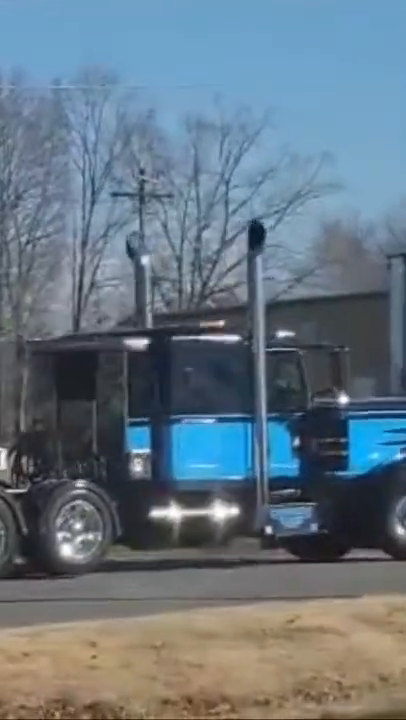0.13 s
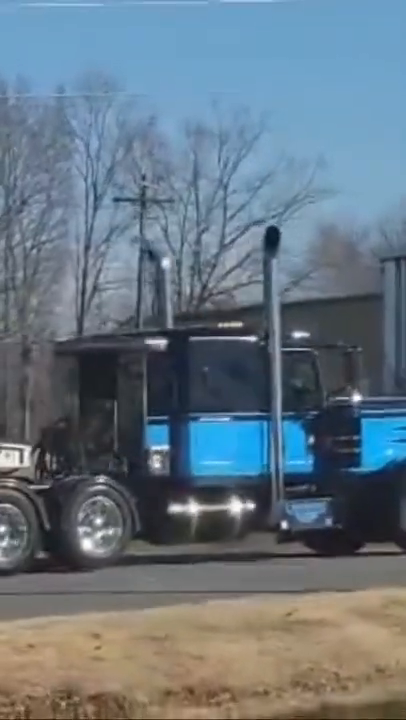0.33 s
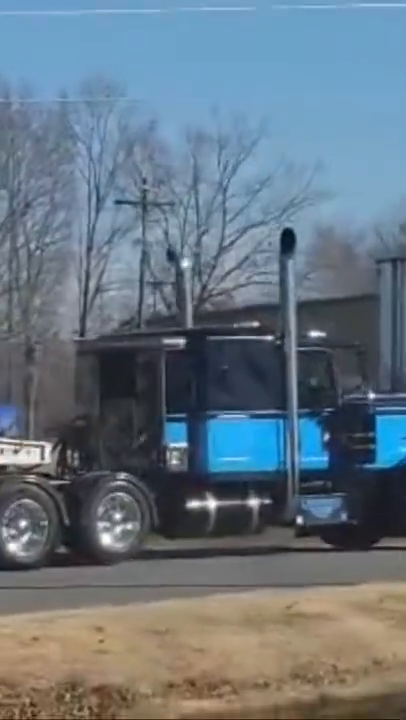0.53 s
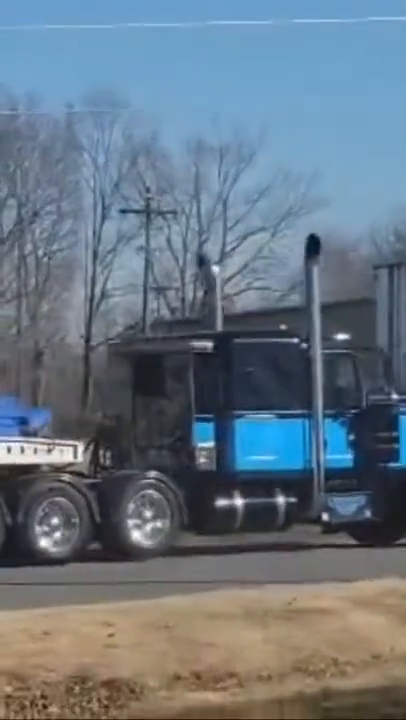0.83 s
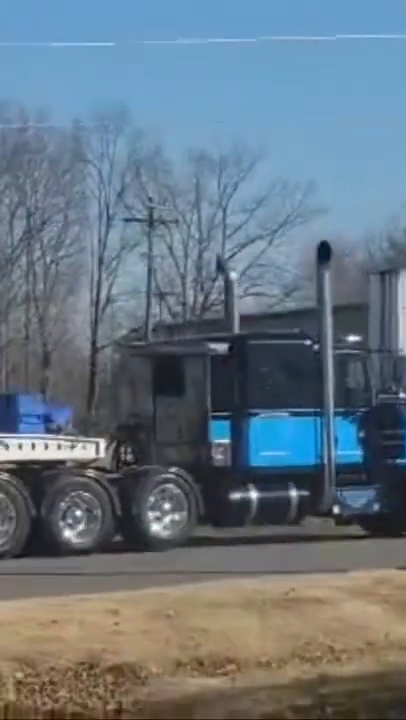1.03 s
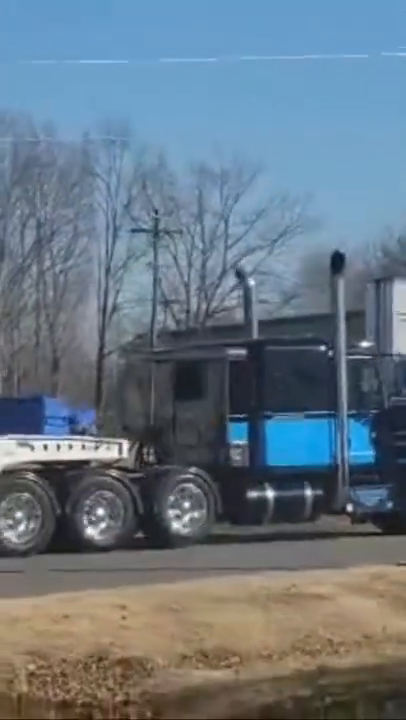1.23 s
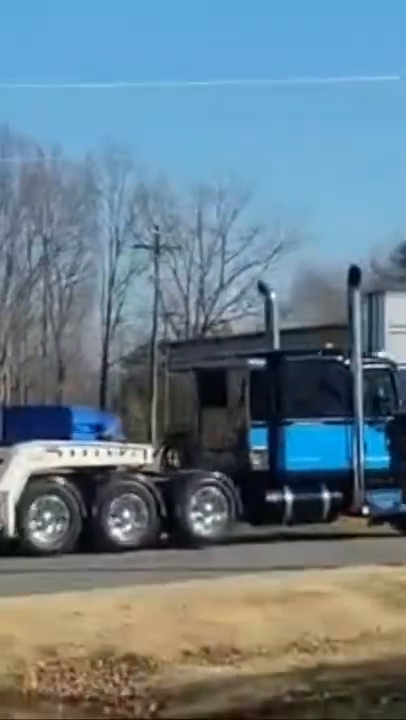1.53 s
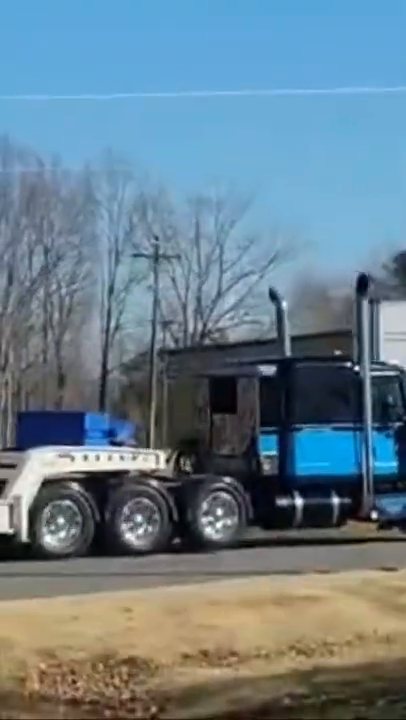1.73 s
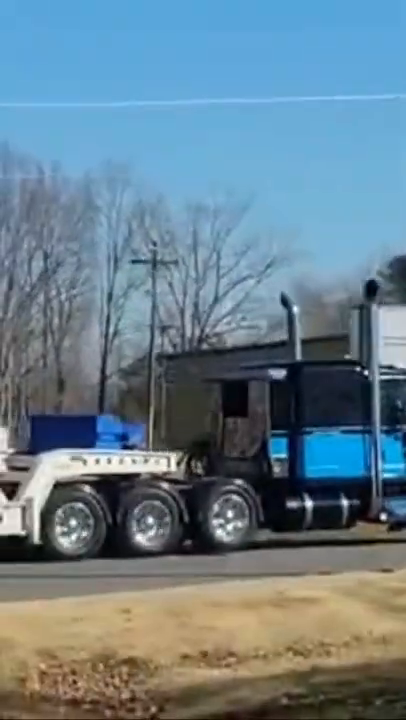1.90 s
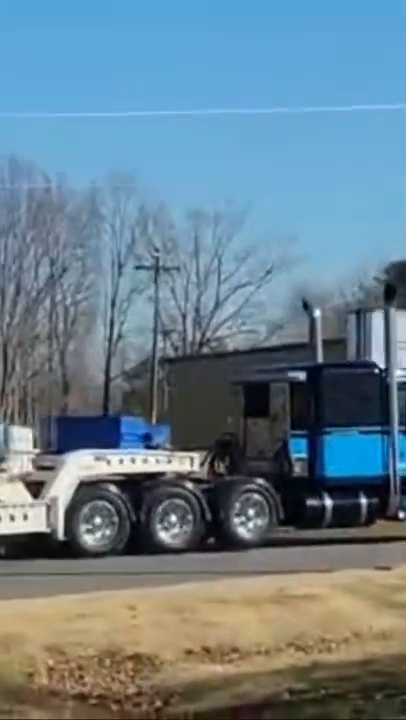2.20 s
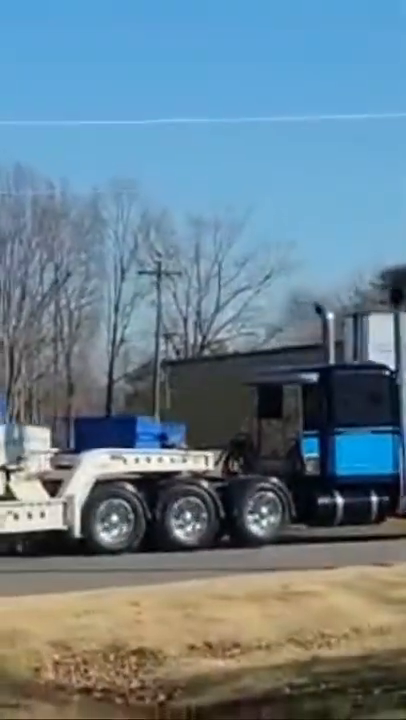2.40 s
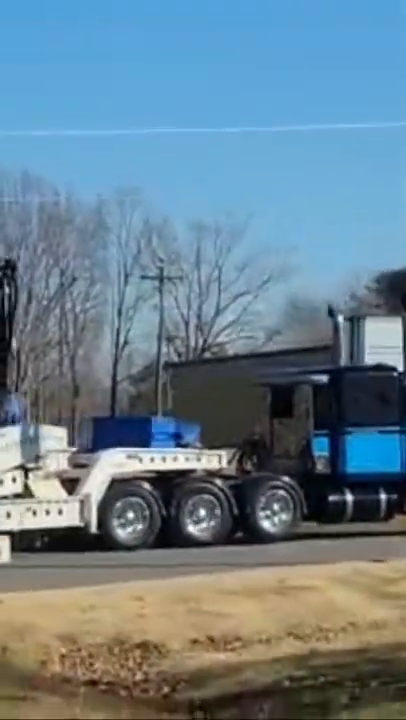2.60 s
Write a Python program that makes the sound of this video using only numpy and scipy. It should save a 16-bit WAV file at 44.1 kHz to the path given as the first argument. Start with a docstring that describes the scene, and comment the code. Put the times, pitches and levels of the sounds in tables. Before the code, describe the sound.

Heavy diesel engine idling close by, lumpy deep exhaust throb, metallic knocking and a quick repeating chirp

```python
"""A big eight-cylinder engine throbs at idle close by, while a heavy truck hauls a trailer on a road.
Uneven firings thump and puff in the exhaust and knock in the block; low cycle orders make the boom.
A second drone, probably the truck's, beats against it. Driven parts hum, and road noise lies underneath.
Fittings rattle, valves tap, loose metal clinks; something, probably a belt, chirps once a cycle."""
import sys
import numpy as np
from scipy import signal
from scipy.fft import rfft, irfft, next_fast_len
from scipy.io import wavfile
from scipy.ndimage import map_coordinates

SR = 44100
rng = np.random.default_rng(int(sys.argv[2]) if len(sys.argv) > 2 else 0)


def file_out(sig):
    """Save sig as 16-bit WAV at sys.argv[1]."""
    # one column per channel
    cols = np.atleast_2d(sig).T
    # limit, then scale
    lim = np.clip(cols, -1, 1)
    pcm = np.round(lim * 32767).astype(np.int16)
    wavfile.write(sys.argv[1], SR, pcm)


N = 121275

# crank speed (time [s], speed [rpm])
CRANK_SPEED = [(0, 604), (.7, 597.2), (1.6, 595.8), (2.75, 596.8)]
# cylinders in firing order, relative (pulse, sets boom phases [dB], bark [dB], knock [dB])
CYLINDERS = [(-2, -4, -1), (-10, 0.5, -2), (1, -5.5, 4.5), (-1, 2, -5), (-16, -6, 4), (0.5, -3, -0.5),
             (-9.5, -1, 2.5), (-1.5, -1.5, 2)]
FIRST_FIRING_S, KNOCK_LEAD_S, JITTER_S, ATTACK_S = 0.0245, 0.02, 0.001, 0.0014

# exhaust boom (multiple of cycle rate, level [dB])
BOOM_ORDERS = [(8, -25), (11, -27.5), (12, -36), (13, -22), (15, -37), (16, -33.5), (17, -37), (18, -43),
               (19, -38), (20, -38.5), (22, -42.5), (24, -40), (25, -43.5), (27, -37), (29, -42), (31, -46),
               (32, -37.5), (34, -48), (35, -38), (36, -47.5), (38, -45.5), (40, -45), (45, -47.5),
               (46, -47), (48, -47)]
SMEAR_ABOVE_ORDER, SMEAR_RAD_PER_ORDER = 15, 0.25

# exhaust thump spectrum (frequency [Hz], relative level [dB])
PIPE_SPECTRUM = [(90, -34), (140, -6.5), (200, -8), (250, -10.5), (285, 7.5), (335, -3.5), (400, -5.5),
                 (540, -12.5), (640, -17), (1200, -31), (3000, -69)]
# gas puff spectrum (frequency [Hz], relative level [dB])
PUFF_SPECTRUM = [(20, -38), (36, -2), (62, -2.5), (100, -1.5), (135, 2), (250, -5), (300, -10.5),
                 (530, -17), (650, -36), (1100, -40.5), (1500, -40.5), (5000, -70)]
PIPE_DB, PUFF_DB, PUFF_DECAY_S = -41.5, -31.5, 0.0064
WALL_DB, WALL_T60_S = 1.5, 0.37

# truck drone (multiple of its firing rate, level [dB])
TRUCK_ORDERS = [(1, -34.5), (2, -35.5)]
TRUCK_HZ, TRUCK_FIRING_S = 67.8, 0.009

# hum of belt-driven parts (frequency [Hz], level [dB])
HUMS = [(96.3, -43), (123.7, -38), (228.7, -47), (278.3, -48), (333.5, -55), (515, -57.5), (557, -53.5),
        (597, -63)]

# tyre and road spectrum (frequency [Hz], relative level [dB])
ROAD_SPECTRUM = [(180, -23), (300, -5), (554, -14.5), (649, -22), (1200, -21.5), (1470, -32.5),
                 (1990, -29.5), (2400, -33.5), (2560, -45), (2940, -40), (3970, -39.5), (5530, -45),
                 (6100, -44), (7820, -47), (11100, -58), (13000, -64.5)]
ROAD_DB = -44

RATTLE_PER_S, RATTLE_DB, RATTLE_DECAY_S = 240, -58, 0.006

# resonances of block and covers (frequency [Hz], width [Hz], relative level [dB])
BLOCK_MODES = [(794, 26, 9), (1120, 32, 4), (1724, 29, 3), (1883, 310, -6.5), (2007, 43, 5), (2359, 36, -3),
               (2826, 72, -7), (2950, 25, -0.5), (3137, 48, -7.5), (3344, 31, -2), (3570, 110, -14.5),
               (3863, 82, -7.5), (4110, 190, -14.5), (4536, 38, -10), (4830, 64, -15), (5110, 44, -13.5)]
KNOCK_DB, KNOCK_DECAY_S = -53.5, 0.021

# valve taps, once a cycle (time of one tap [s], pitch [Hz], relative level [dB])
VALVE_TAPS = [(.028, 5190, 6), (.048, 4040, 5.5), (0.049, 3356, 12.5), (0.106, 3640, 5.5),
              (.154, 4870, 3.5), (.203, 2972, 11), (0.202, 6420, -1.5)]
VALVE_DB, VALVE_DECAY_S, VALVE_WOBBLE_PER_S = -80, 0.014, 160

# clinks of loose metal (time [s], relative level [dB])
CLINKS = [(0.06, 0), (.598, 4), (0.658, 3.5), (.855, 1), (1.005, -0.5), (1.054, 0.5), (1.255, 2),
          (2.412, 3)]
# clink spectrum (frequency [Hz], relative level [dB])
CLINK_SPECTRUM = [(1500, -28.5), (3000, 1), (4000, -3), (5200, -4), (5700, -3.5), (7500, -6.5),
                  (10000, -16.5), (13000, -54)]
CLINK_DB, CLINK_DECAY_S = -74.5, 0.014

# chirp spectrum (frequency [Hz], relative level [dB])
CHIRP_SPECTRUM = [(600, -66.5), (1080, -27), (1200, 1.5), (1270, 4), (1350, -3.5), (1470, -32), (2500, -57)]
CHIRP_DB, CHIRP_START_S = -46.5, 0.1486
CHIRP_RISE_S, CHIRP_HOLD_S, CHIRP_DECAY_S = 0.01, 0.013, 0.017

# left-right correlation of noise, clipped to -1..1 (frequency [Hz], correlation)
CORRELATION = [(60, -0.7), (170, 1.07), (350, 0.66), (700, 0.48), (1300, -0.1), (2200, 0.57), (5000, -0.02),
               (10000, 0.1)]
# channel balance (frequency [Hz], left over right [dB])
BALANCE = [(40, -8), (65, 1.7), (170, -0.4), (350, 3), (550, -0.5), (800, 3.5), (1400, 3), (2000, 0.4),
           (3100, 2), (4200, -0.5), (10000, 1)]
CLATTER_FADE_DB_PER_S, TOP_HZ = -1, 13000


def amp(db):
    """Decibels to gain."""
    return 10 ** (np.asarray(db) / 20)


def unit(x):
    """Scale to rms 1."""
    return x / np.sqrt(np.mean(x ** 2) + 1e-20)


def along(points, hz):
    """Interpolate (Hz, value) points on a log frequency axis."""
    f, v = np.transpose(points)
    return np.interp(np.log(hz + 1), np.log(f + 1), v)


def wobble(knots_per_s):
    """Smooth random curve through normally distributed knots."""
    knots = rng.standard_normal(int(N * knots_per_s / SR) + 4)
    return map_coordinates(knots, [np.arange(N) * knots_per_s / SR])


def filtered(x, response):
    """Apply a response given as a function of frequency."""
    m = next_fast_len(N + SR // 2)
    return irfft(rfft(x, m) * response(np.fft.rfftfreq(m, 1 / SR)), m)[..., :N]


def coloured(x, spectrum):
    """Shape x by (Hz, dB) points, at rms 1."""
    return unit(filtered(x, lambda hz: amp(along(spectrum, hz))))


def noise():
    """White stereo noise; the mid-side split sets the left-right correlation at each frequency."""
    def mid_side_gains(hz):
        angle = np.arccos(np.clip(along(CORRELATION, hz), -1, 1)) / 2
        return np.array([np.cos(angle), np.sin(angle)])

    mid, side = filtered(rng.standard_normal((2, N)), mid_side_gains)
    return np.array([mid + side, mid - side])


def cycles(start_s):
    """Engine cycles (two crank turns each) counted from a moment."""
    t = np.arange(N) / SR
    turned = np.cumsum(np.interp(t, *np.transpose(CRANK_SPEED))) / SR / 120
    return turned - np.interp(start_s, t, turned)


def firings(start_s, levels_db, scatter_db):
    """One impulse per event, evenly spaced in the cycle, with random level and timing errors."""
    count = np.floor(cycles(start_s) * len(levels_db)).astype(int)
    at = np.flatnonzero(np.diff(count)) + 1
    level_error, late = rng.standard_normal((len(at), 2)).T
    sizes = amp(levels_db[count[at] % len(levels_db)] + scatter_db * level_error)
    jittered = at + (JITTER_S * SR * late).astype(int)
    return np.bincount(np.clip(jittered, 0, N - 1), sizes, N)


def bursts(pulses, decay_s):
    """A short rise-and-decay envelope after each impulse, at rms 1."""
    t = np.arange(SR // 8) / SR
    envelope = np.exp(-t / decay_s) * (1 - np.exp(-t / ATTACK_S))
    return unit(signal.fftconvolve(pulses, envelope)[:N])


def boom(pulse_db):
    """Unsteady cycle orders, phased by the uneven firing pattern; pipe and walls smear high ones."""
    turn, slots = cycles(FIRST_FIRING_S), np.arange(len(pulse_db)) / len(pulse_db)
    out = np.zeros(N)
    for order, db in BOOM_ORDERS:
        pattern = np.sum(amp(pulse_db) * np.exp(-2j * np.pi * order * slots))
        smear_rad = SMEAR_RAD_PER_ORDER * max(order - SMEAR_ABOVE_ORDER, 0) * rng.standard_normal()
        phase = 2 * np.pi * order * turn + np.angle(pattern) + smear_rad
        out += amp(db + 1.54 * wobble(13)) * np.cos(phase)
    return out


def exhaust(bark_db):
    """Each firing thumps through the pipe, scatters off nearby walls and drags a puff of gas."""
    pulses = firings(FIRST_FIRING_S, bark_db, scatter_db=2.3)
    t = np.arange(SR // 4) / SR
    tail = noise()[:, :len(t)] * np.exp(-np.log(1000) * t / WALL_T60_S)
    tail /= np.linalg.norm(tail[0])
    echo = signal.fftconvolve(pulses[None], tail, axes=1)[:, :N]
    thumps = coloured(pulses + amp(WALL_DB) * echo, PIPE_SPECTRUM)
    # 1.9: steady gas flow under the puffs
    puffs = coloured(noise() * (bursts(pulses, PUFF_DECAY_S) + 1.9), PUFF_SPECTRUM)
    return amp(PIPE_DB) * thumps + amp(PUFF_DB) * puffs


def truck():
    """Even drone of harmonics; beats with the engine's order 13 about three times a second."""
    turn = TRUCK_HZ * (np.arange(N) / SR - TRUCK_FIRING_S)
    return sum(amp(db + wobble(8.4)) * np.cos(2 * np.pi * k * turn) for k, db in TRUCK_ORDERS)


def driven_parts():
    """Belt-driven parts hum at fixed pitches, wavering in level and phase."""
    t = np.arange(N) / SR
    out = np.zeros(N)
    for hz, db in HUMS:
        level = amp(db + 1.5 * wobble(9.6))
        out += level * np.sin(2 * np.pi * hz * t + 0.61 * wobble(7.9))
    return out


def road():
    """Rush of tyres and road: coloured noise, slightly unsteady."""
    return amp(ROAD_DB + 1.2 * wobble(6.58)) * coloured(noise(), ROAD_SPECTRUM)


def rattle(low_hz=1700, high_hz=4600):
    """Fittings rattle in a random scatter of tiny decaying rings, the high ones weaker."""
    out, t = np.zeros((2, N + SR)), np.arange(SR // 20) / SR
    envelope = np.exp(-t / RATTLE_DECAY_S) * (1 - np.exp(-t / ATTACK_S))
    for when, place, angle in rng.random((int(RATTLE_PER_S * N / SR), 3)):
        hz = low_hz * (high_hz / low_hz) ** place
        # opposite phase shifts left and right
        ring = np.sin(2 * np.pi * hz * t + np.outer([1, -1], np.pi * (angle - 0.5)))
        out[:, int(when * N):][:, :len(t)] += ring * envelope / np.sqrt(hz)
    return amp(RATTLE_DB) * unit(out[:, :N])


def block_response(f):
    """Sum of block and cover resonances with alternating signs."""
    total = 0
    for k, (centre, width, db) in enumerate(BLOCK_MODES):
        mode = 1j * f * width / (centre * centre - f * f + 1j * f * width)
        total = total + amp(db) * mode * (-1) ** k
    return total


def knocks(knock_db):
    """Combustion knocks, as noise bursts over a steady floor, ring the block."""
    pulses = firings(FIRST_FIRING_S - KNOCK_LEAD_S, knock_db, scatter_db=2.5)
    drive = noise() * (bursts(pulses, KNOCK_DECAY_S) + 0.6)
    return amp(KNOCK_DB) * unit(filtered(drive, block_response))


def valves():
    """Each valve rings briefly near its own pitch once a cycle; random phase broadens the tone."""
    out, t = np.zeros((2, N)), np.arange(N) / SR
    for tap_s, hz, db in VALVE_TAPS:
        phase = np.array([wobble(VALVE_WOBBLE_PER_S), wobble(VALVE_WOBBLE_PER_S)])
        ring = np.sin(2 * np.pi * hz * t + phase)
        taps = bursts(firings(tap_s, np.zeros(1), scatter_db=3.5), VALVE_DECAY_S)
        out += amp(VALVE_DB + db) * taps * ring
    return out


def clinks():
    """Loose metal clinks now and then: short bursts of bright noise."""
    times_s, levels_db = np.transpose(CLINKS)
    pulses = np.bincount((times_s * SR).astype(int), amp(levels_db), N)
    return amp(CLINK_DB) * coloured(noise(), CLINK_SPECTRUM) * bursts(pulses, CLINK_DECAY_S)


def chirp():
    """Rough chirp of even strength once a cycle: narrow noise with its own envelope flattened."""
    turn = cycles(CHIRP_START_S)
    age_s = turn % 1 / (np.gradient(turn) * SR)
    decay_age_s = np.maximum(age_s - CHIRP_RISE_S - CHIRP_HOLD_S, 0)
    swell = np.minimum(age_s / CHIRP_RISE_S, 1) * np.exp(-decay_age_s / CHIRP_DECAY_S)
    phase = np.angle(signal.hilbert(coloured(noise(), CHIRP_SPECTRUM)))
    return amp(CHIRP_DB) * swell * unit(np.cos(phase))


def scene():
    """Engines and road together; the clatter and rush ease off slowly."""
    pulse_db, bark_db, knock_db = np.transpose(CYLINDERS)
    fade = amp(CLATTER_FADE_DB_PER_S * (np.arange(N) - N / 2) / SR)
    steady = boom(pulse_db) + exhaust(bark_db) + truck() + driven_parts() + chirp()
    easing = road() + rattle() + knocks(knock_db) + valves() + clinks()
    return steady + fade * easing


def record(dry):
    """Two microphones differ a little in colour; nothing is kept from TOP_HZ up."""
    def response(hz):
        return amp(np.outer([0.5, -0.5], along(BALANCE, hz))) * (hz < TOP_HZ)

    return filtered(dry, response)


dry = scene()
out = record(dry)
file_out(out)
```